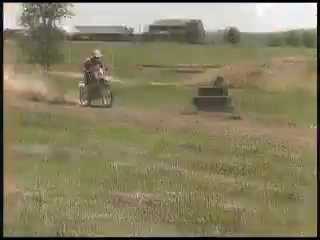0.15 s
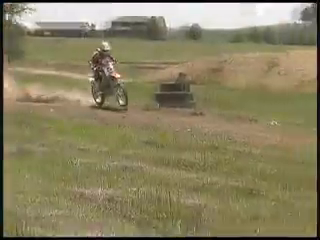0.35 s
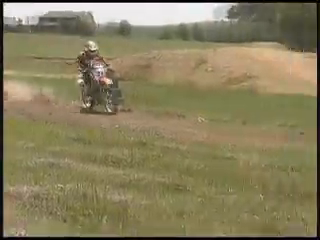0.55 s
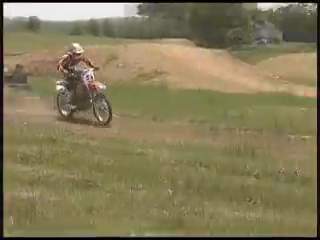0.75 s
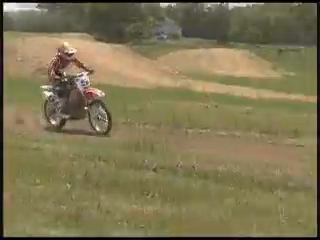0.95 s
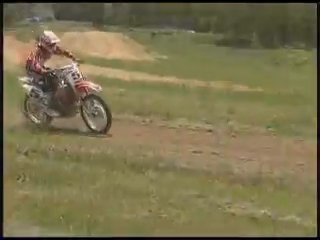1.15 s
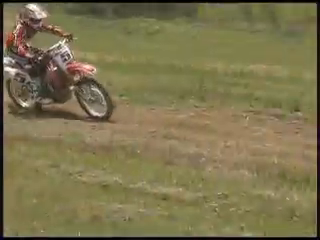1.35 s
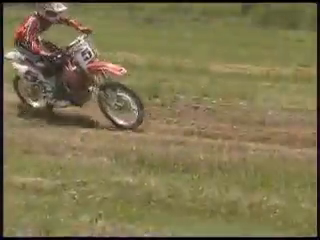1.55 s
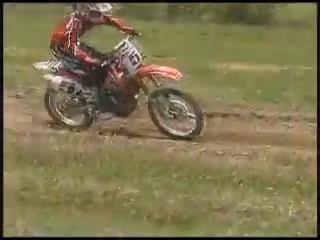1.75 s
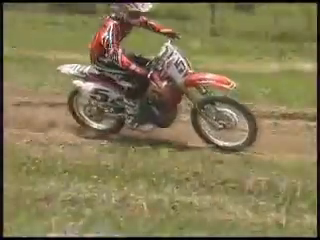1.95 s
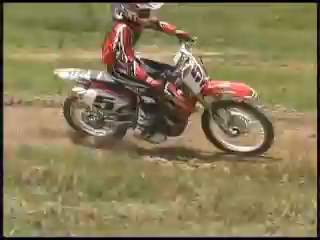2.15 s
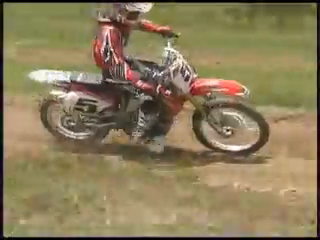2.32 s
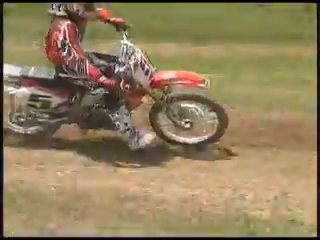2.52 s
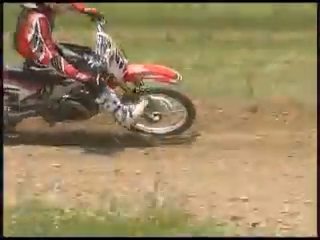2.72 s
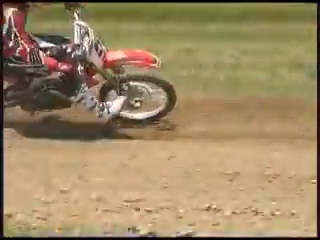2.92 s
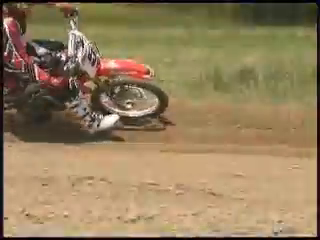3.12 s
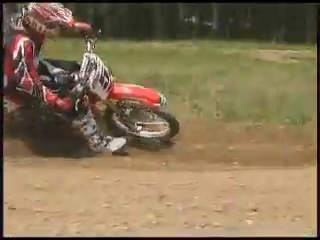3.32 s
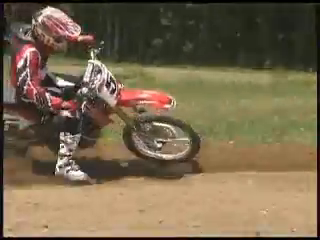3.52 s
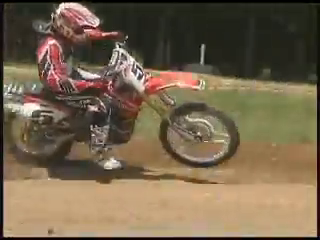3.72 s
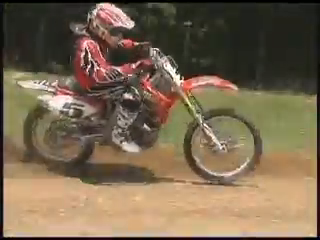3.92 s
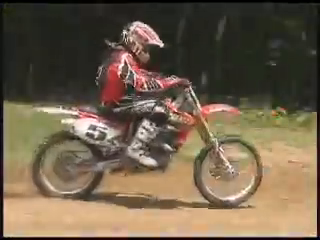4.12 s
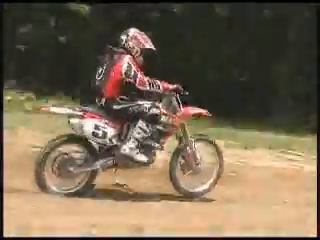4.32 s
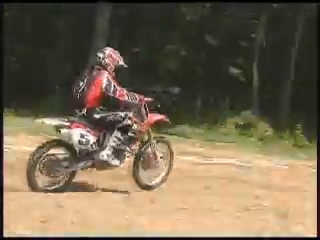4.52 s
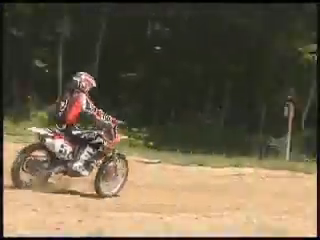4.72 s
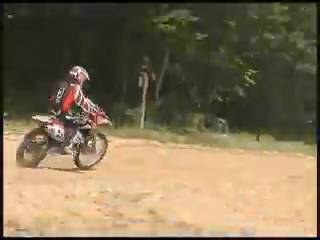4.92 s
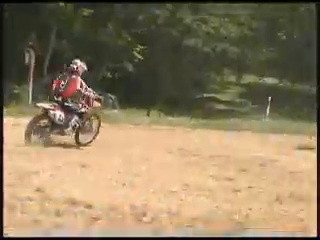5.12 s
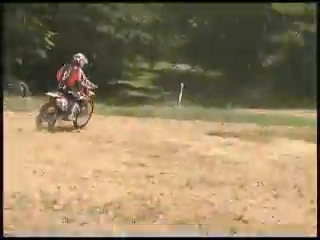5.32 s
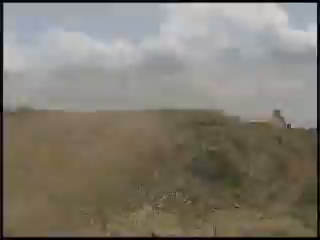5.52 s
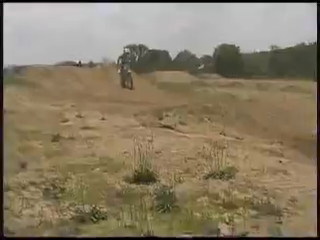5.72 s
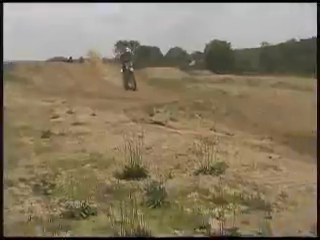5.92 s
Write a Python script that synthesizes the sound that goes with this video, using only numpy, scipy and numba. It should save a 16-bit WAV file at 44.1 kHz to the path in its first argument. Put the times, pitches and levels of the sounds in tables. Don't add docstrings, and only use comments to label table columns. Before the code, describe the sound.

From 0 to about 0.35 s, quick, heavy low beats of a bigger idling engine resonate under a roof and die away, with a wind rumble over a thin distant dirt bike buzz. The bike rises in pitch and rasp around 0.6 s, then the throttle shuts near 0.85 s. Until 2.4 s it slows from a buzz to separate, uneven dull putts, with chain and valve clatter and a few slaps around 1.3-1.4 and 2.3-2.4 s. Blips at 2.8-2.9 s grow fuller and deeper; at 3.2-3.4 s it opens hard, revs leap, sharp tailpipe cracks and hiss become loud and close. From 3.5 to 5.2 s it powers away in a steady bright snarl, with a harsh peak and a wind buffet near 4.9 s. It lifts off, dropping in pitch and fading until 5.67 s, when an abrupt cut brings a louder revving climb. Compressed, slightly overloaded outdoor sound.

```python
import sys
import numpy as np
from scipy import signal
from scipy.fft import rfft, irfft, next_fast_len
from scipy.io import wavfile
from scipy.ndimage import uniform_filter1d
from numba import njit

SR = 44100
rng = np.random.default_rng(int(sys.argv[2]) if len(sys.argv) > 2 else 0)


def makeup_ratio(level_db):
    decades = np.asarray(level_db, float) / 20
    return 10 ** decades


def waveform_to_disk(signal):
    frames = np.transpose(np.atleast_2d(signal))
    scaled = np.clip(frames, -1, 1) * 32767
    samples = np.round(scaled).astype(np.int16)
    wavfile.write(sys.argv[1], SR, samples)


N = 262836


def in_time(*tables):
    s, *columns = np.concatenate(tables).T
    return [np.interp(np.arange(N) / SR, s, column) for column in columns]


def at_hz(points, hz):
    points_hz, values = np.array(points).T
    return np.interp(np.log(hz + 1), np.log(points_hz), values)


def even(x):
    power = uniform_filter1d(uniform_filter1d(x ** 2, size=3000), size=3000)
    return x / np.sqrt(power + 1e-12)


def drift(rate):
    r = np.exp(-2 * np.pi * rate / SR)
    slow = signal.lfilter([1], [1, -2 * r, r * r], rng.standard_normal(N + SR))[SR:]
    return slow / slow.std()


def swell(s, half_s):
    out = np.zeros(N)
    near = np.arange(max(int((s - half_s) * SR), 0), min(int((s + half_s) * SR), N))
    out[near] = .5 + .5 * np.cos(np.pi * np.clip((near / SR - s) / half_s, -1, 1))
    return out


def swells(table):
    return sum(height * swell(s, half_s) for s, height, half_s in table)


def clicks(at, strength):
    out = np.full(N, 1e-18)
    out[np.clip(at, 0, N - 1)] = strength
    return out


def colour(x, spectrum):
    cepstrum = irfft(np.log(makeup_ratio(at_hz(spectrum, np.linspace(0, SR / 2, 2049)))))
    cepstrum[1:2048] *= 2
    cepstrum[2049:] = 0
    return signal.fftconvolve(x, irfft(np.exp(rfft(cepstrum))))[:N]


def band(x, low_hz, high_hz, order):
    return signal.sosfilt(signal.butter(order, [low_hz, high_hz], "band", fs=SR, output="sos"), x)


@njit
def resonance(x, hz, width, sr):
    out, r = np.zeros(len(x)), np.exp(-np.pi * width / sr)
    for i in range(2, len(x)):
        drive = (1 - r * r) / 2 * (x[i] - x[i - 2])
        out[i] = drive + 2 * r * np.cos(2 * np.pi * hz[i] / sr) * out[i - 1] - r * r * out[i - 2]
    return out


def steady_resonance(x, hz, width):
    return resonance(x, np.full(N, hz), width, SR)


def idling():
    # start in seconds, peak in dB, pipe pitch as a share of its mean.
    beats = [
        (0.004, -7.5, 0.88),
        (0.044, -9.5, 1.08),
        (0.082, -8, 0.98),
        (0.119, -10, 1.07),
        (0.146, -15.5, 1.05),
        (0.183, -11.5, .98),
        (0.216, -14, .85),
        (0.25, -19, 0.9),
        (0.287, -17.5, 0.73),
        (0.319, -21, .8),
    ]
    # mode in Hz, level in dB, t60 in seconds, how far it follows the pipe pitch (0-1).
    modes = [(52.7, -1.5, 0.15, 0), (99, -9, 0.31, 0.17), (130, 7, 0.17, 0.7), (181, -6, 0.16, 0.95),
             (252.5, -7, 0.12, 0.48), (279.5, -14, 0.17, 0.21), (446, -12.5, 0.14, .3)]
    out, t = np.zeros(N), np.arange(SR // 2) / SR
    luck = rng.standard_normal((len(beats), len(modes)))
    for (s, peak_db, bend), chances in zip(beats, luck):
        start = int(s * SR)
        for (hz, mode_db, t60, follows), chance in zip(modes, chances):
            decay = makeup_ratio(peak_db + mode_db - 5.5 + 1.2 * chance - 60 * t / t60)
            out[start:start + len(t)] += decay * np.sin(2 * np.pi * hz * bend ** follows * t)
    out = out * (1 + 0.22 * drift(71.0))
    fade_out = np.interp(np.arange(N) / SR, [.32, .38], [1, 0])
    return band(out, 47, 466, order=3) * fade_out


def speed():
    # time in seconds, firings per second.
    ride_speed = [(0, 77.69), (0.36, 76.01), (0.59, 92.68), (0.72, 89.33), (0.91, 63.79), (1.38, 43.39),
                  (1.74, 33.29), (2.39, 27.69), (2.73, 31.41), (2.82, 41.72), (3.16, 42.7), (3.35, 78.41),
                  (3.47, 63.79), (4.23, 63.4), (4.31, 66.66), (5.15, 70.57), (5.38, 50.02), (5.66, 40.82)]
    climb_speed = [(5.67, 75.7), (5.74, 69.99), (5.82, 64.52), (5.9, 64.4), (5.96, 68.48)]
    # moment in seconds, extra firings per second, half length
    # in seconds.
    speed_wiggles = [(0.34, 3.81, 0.14), (1.02, -1.5, .08), (1.17, 2.9, .08), (1.29, -2, .05), (1.42, 2.2, .06),
                     (1.49, -2.5, .05), (1.84, -2.3, .07), (1.95, 3.5, .07), (2.05, -2, .05), (1.68, 4.18, 0.05),
                     (2.04, 5.26, 0.14), (2.56, 3.42, 0.07), (3.62, -5.13, 0.07), (3.88, 2.94, 0.14),
                     (4.4, 2.87, 0.14), (4.76, 2.99, 0.05), (4.9, -3.08, 0.05), (4.9, 5.83, 0.1),
                     (4.92, 6.72, 0.05), (5.12, 9.29, 0.07)]
    return in_time(ride_speed, climb_speed)[0] + swells(speed_wiggles)


def firings():
    turns = .575 + np.cumsum(speed()) / SR
    change = round(5.67 * SR)
    turns[change:] += np.ceil(turns[change]) + .09 - turns[change]
    return np.flatnonzero(np.diff(np.floor(turns)) > 0)


def controls():
    # time in seconds, tailpipe in dB, load (0-1), muffler in dB, chamber in Hz.
    ride = [(0, -24, 0.67, -31, 159), (.39, -21.5, 0.88, -37.5, 152), (.6, -17.5, 0.77, -39.5, 188),
            (.72, -19, 0.92, -41, 170), (.9, -23, 0.5, -44, 152), (1.2, -24.5, 0.23, -39.5, 156),
            (1.33, -22.5, 0.75, -38, 142), (1.42, -22, 0.74, -37.5, 138), (1.53, -22.5, 0.63, -36.5, 150),
            (1.7, -23.5, 0.7, -34.5, 141), (1.82, -26, 0.56, -37, 130), (1.88, -21.5, 0.54, -34.5, 124),
            (1.97, -21.5, 0.75, -32.5, 143), (2.08, -21, 0.6, -31.5, 129), (2.22, -21.5, 0.9, -33.5, 121),
            (2.42, -21.5, 0.57, -33, 129), (2.62, -19, 0.8, -29, 125), (2.75, -19, 0.87, -31, 132),
            (2.82, -27, 0.27, -29, 170), (2.95, -25, 0.56, -26.5, 173), (3.14, -22, 0.4, -26.5, 169),
            (3.205, -19, 0.74, -24, 238), (3.27, -16, 0.88, -23, 189), (3.34, -13, 0.86, -26.5, 142),
            (3.6, -18, 0.89, -34, 135), (3.9, -21.5, 0.76, -37, 135), (4.1, -17.5, 0.84, -37, 138),
            (4.35, -16.5, 0.87, -33.5, 131), (4.8, -19, 0.93, -37, 154), (4.88, -12.5, 0.93, -36, 150.5),
            (5.02, -17, 0.97, -38.5, 142)]
    climb = [(5.2, -17.5, 0.97, -38, 145), (5.3, -23.5, 0.34, -39, 175), (5.66, -25, 1, -38, 130),
             (5.676, -15.5, 0.49, -24.5, 151), (5.75, -18, 0.68, -35, 141), (5.96, -19, 0.77, -36.5, 116)]
    # start and end in seconds, tailpipe
    # drop in dB, muffler drop in dB.
    closings = [
        (0.603, 0.69, 5.5, 0.5),
        (0.789, 0.841, 8.5, 9),
        (0.854, 2.791, 10.5, 1.5),
        (5.206, 5.672, 16, 6.5),
        (5.636, 5.673, 16.5, 3),
    ]
    # moment in seconds, gain in dB, half length in seconds.
    blips = [
        (2.048, 1.5, 0.023),
        (2.811, 5.5, 0.05),
        (2.938, 5, 0.11),
        (3.464, 0, 0.036),
        (4.037, 0.5, 0.14),
        (5.059, 4.5, 0.066),
    ]
    pipe_db, load, thump_db, chamber_hz = in_time(ride, climb)
    pipe_db = pipe_db + swells(blips)
    shut = np.zeros(N)
    slide_s, snap_open_s = 0.019, 0.0034
    for start, end, pipe_drop_db, thump_drop_db in closings:
        corners = [start, start + slide_s, end, end + snap_open_s]
        slide = np.interp(np.arange(N) / SR, corners, [0, 1, 1, 0])
        pipe_db = pipe_db - pipe_drop_db * slide
        thump_db = thump_db - thump_drop_db * slide
        shut = np.maximum(shut, slide)
    load_left = 0.55
    return pipe_db, load * (1 - (1 - load_left) * shut), thump_db, chamber_hz, shut


def blast(fired, front, luck):
    # time in seconds, hiss lag in ms, front in dB, share of sharp edge (0-1), share of long tail (0-1).
    jet = [(.1, 0.76, -10, 0.8, 0.1), (.45, 1.3, -5, 0, 0), (.8, 0.6, 1, 0.5, 0), (1.5, 1.34, 0, 0.7, 0.6),
           (2.8, 0.79, 2, 0, 0.9), (3.2, 1.15, -6, 0.05, 1), (3.45, 0.57, -7, 0, 0.3),
           (3.9, 1.12, 5, 0.26, 0.22), (4.4, 0.75, -22, 0.3, 0), (4.8, 0.49, -12, 0.4, 0),
           (4.95, 0.3, 3, 0.4, 0.2), (5.2, 0.29, -26, 1, 0.25), (5.67, 0.52, 1, 0.1, 0.3),
           (5.96, 0.44, 4, 0, 0)]
    jet_ms, front_db, sharp, tail = in_time(jet)
    sharp, tail = np.clip(sharp, 0, 1), np.clip(tail, 0, 1)
    echo_lag_s = .00103 + .00013 * drift(2.0)[fired] + .00002 * luck[:, 1]
    echo = clicks(fired + (SR * echo_lag_s).astype(int), -makeup_ratio(-3.0 + 1.0 * luck[:, 2]))
    shock = front + echo
    shock = 1.52 * makeup_ratio(front_db) * (sharp * shock + (1 - sharp) * band(shock, 200, 3450, order=2))
    jets = clicks(fired + (SR * jet_ms[fired] / 1000).astype(int), front[fired] * makeup_ratio(luck[:, 5]))
    t = np.arange(round(.03 * SR)) / SR
    rise = 1 - np.exp(-t / 0.0001)
    short, long = [signal.fftconvolve(jets, rise * np.exp(-t / tau_s))[:N] for tau_s in (0.0013, 0.0036)]
    puff = (1 - tail) * short + tail * long
    hiss = puff * rng.standard_normal(N)
    return shock + makeup_ratio(-13) * hiss + band(hiss, 1850, 17500, order=2), puff


def crack(fired, front, luck):
    # frequency in Hz, level in dB per Hz.
    crack_spectrum = [(210, -58), (350, 13), (412, -24), (457, -105), (932, -3.5), (1520, -4), (1690, -1),
                      (3190, -7), (5870, -10.5), (9160, -19), (11300, -14.5), (12100, -128), (15800, -33),
                      (22000, -120)]
    # time in seconds, lower in Hz, lower in dB, upper in Hz, upper in dB.
    mouth = [(.1, 1120, 2, 2580, -6), (.3, 1280, 8, 2360, 8), (.4, 1330, 14, 2040, 2),
             (.5, 1480, -22, 2760, 8), (.58, 1470, -23, 3520, 20), (.68, 1400, -20, 3060, 14),
             (.8, 1350, -19, 2760, 16), (1.5, 1350, 20.5, 3180, 14), (2.2, 1060, 18.5, 2860, 9),
             (2.8, 960, 16, 3140, 8), (2.95, 1050, 22, 2550, 6), (3.1, 1120, 17, 2700, 2),
             (3.19, 1050, 34, 2470, 3), (3.25, 1350, 13, 1980, 3), (3.32, 1570, 3, 2380, 12),
             (3.39, 1440, 4, 2500, 4), (3.46, 1540, -4, 2460, -4), (3.55, 1450, 9, 2920, 1),
             (3.7, 1320, 8, 3200, 1), (3.9, 1150, 14, 2930, -2.5), (4.1, 1410, 5, 2760, 1),
             (4.3, 1530, 3, 3020, 0), (4.5, 1520, 9, 3220, 3.5), (4.65, 1500, 17, 2080, -1),
             (4.8, 1530, 8.5, 2340, -4), (4.86, 1740, 2, 2700, 9), (4.93, 1590, -2, 2880, 4),
             (5.0, 1770, -4, 2780, 8), (5.07, 1730, -14, 2500, 6), (5.14, 1690, 0, 2860, 8),
             (5.2, 1840, 6, 2760, 3), (5.67, 1340, 14, 2230, 18), (5.96, 2300, 8, 2760, 10)]
    # time in seconds, share (0-1).
    snap_share = [(0, .25), (.38, .42), (.85, .35), (1.0, .08), (3.2, .08), (3.5, .08), (4.8, .08),
                  (4.9, .13), (5.2, .14), (5.67, .15), (5.96, .15)]
    # time in seconds, share (0-1).
    tone_share = [(0, .08), (.35, .2), (.6, .12), (.85, .08), (1.0, .04), (2.75, .06), (2.95, .22),
                  (3.2, .35), (3.45, .35), (3.7, .2), (4.2, .18), (4.8, .22), (4.9, .35), (5.2, .35),
                  (5.3, .1), (5.66, .1), (5.7, .25), (5.96, .2)]
    low_hz, low_db, high_hz, high_db = in_time(mouth)
    burst, puff = blast(fired, front, luck)
    burst = colour(burst, crack_spectrum)
    low_ring = makeup_ratio(low_db) * resonance(burst, low_hz, 420., SR)
    high_ring = makeup_ratio(high_db) * resonance(burst, high_hz, 1100., SR)
    burst = burst + low_ring + high_ring
    snap, = in_time(snap_share)
    bare = band(front, 1050, 4800, order=3)
    burst = np.sqrt(1 - snap) * even(burst) + np.sqrt(snap) * even(bare)
    tone, = in_time(tone_share)
    rung = np.zeros(N)
    for hz, db, width in ((low_hz, low_db, 330.), (high_hz, high_db, 650.)):
        rung += makeup_ratio(.5 * db) * resonance(resonance(front, hz, width, SR), hz, 2 * width, SR)
    return np.sqrt(1 - tone) * burst + np.sqrt(tone) * even(rung), puff


def clatter():
    # frequency in Hz, level in dB per Hz.
    clatter_spectrum = [(210, -109), (350, 11.5), (974, 0.5), (1080, 3.5), (1250, 3.5), (1870, 0),
                        (2110, 5.5), (4230, -2.5), (10200, -16.5), (10900, -23), (12100, -118),
                        (15800, -116), (22000, -120)]
    noise = colour(rng.standard_normal(N), clatter_spectrum) * makeup_ratio(1.05 * drift(60.0))
    rattle = steady_resonance(noise, 4200., 700.) * makeup_ratio(-1 + 4.0 * drift(18.))
    return noise + rattle


def tailpipe(fired, luck):
    # time in seconds, treble in dB.
    facing = [(.1, -4), (.36, -5.5), (.57, 1), (.75, 2), (1.2, -0.5), (2.25, -0.5), (2.75, -1.5),
              (3.2, 0.5), (3.4, 1), (3.6, -1.5), (3.8, -3.5), (3.95, -0.5), (4.15, -1.5), (4.3, -3),
              (4.45, -2.5), (4.6, 1), (4.82, 0.5), (5.0, -3), (5.18, -1.5), (5.35, -5), (5.7, -0.5),
              (5.85, 1), (5.96, 0.5)]
    # time in seconds, body in dB.
    flank = [(0, -10), (.3, -18), (.5, -28), (.65, -22), (.8, -21), (1.0, -13), (2.7, 2.5), (3.0, -1),
             (3.3, -4), (3.6, -4.5), (4.0, 2), (4.5, 1), (4.85, 1), (5.15, 1), (5.5, -15), (5.7, -3),
             (5.96, -5)]
    # moment in seconds, clatter gain in dB, half length in seconds.
    slaps = [
        (1.323, 3, 0.019),
        (1.402, 3, 0.045),
        (1.438, 3, 0.013),
        (2.265, 4.5, 0.059),
        (2.348, 5.5, 0.038),
        (2.401, 9, 0.018),
        (2.77, 6.5, 0.024),
    ]
    level_db, share, thump_db, _, shut = controls()
    treble_db = -4.5 - 1.5 * share + in_time(facing)[0] + 1.51 * drift(10.5)
    slap_db = swells(slaps)
    body_db = -6.5 + np.minimum(thump_db - level_db, 0) - 14.5 * shut + in_time(flank)[0]
    uneven_db = .4 + 4.0 * (1 - np.clip(share[fired], 0, 1))
    front = clicks(fired, makeup_ratio(uneven_db * luck[:, 0]))
    burst, puff = crack(fired, front, luck)
    share = np.clip(share, .01, .99)
    mix = np.sqrt(share) * even(burst) + np.sqrt(1 - share) * makeup_ratio(slap_db) * even(clatter())
    top = signal.sosfilt(signal.butter(2, 4500, "high", fs=SR, output="sos"), mix)
    mix = mix + (makeup_ratio(treble_db + 12.5) - 1) * top
    breath = (.15 * puff + .04) * rng.standard_normal(N)
    body = band(14.0 * share * front + breath, 640, 1050, order=3)
    direct = even(band(mix, 890, 8870, order=4))
    return makeup_ratio(level_db + 0.44 * slap_db) * (direct + makeup_ratio(body_db) * even(body))


def muffler(fired, luck):
    # time in seconds, level left
    # in the dip in dB, upper chamber in dB.
    ground = [(.2, -16, -11), (.36, -19, 4.5), (.5, -9.5, -4), (.62, -5, -11), (.75, -13, 2.5),
              (.9, -9, -5), (1.2, -23, -5.5), (1.45, -21, -6), (1.7, -29, -11), (1.95, -37, -6),
              (2.2, -32, -5), (2.42, -47, -13.5), (2.65, -33, -8), (2.8, -10.5, -4.5), (2.95, -14, -5.5),
              (3.1, -12.5, -7.5), (3.22, -9.5, -1.5), (3.62, -6.5, 1.5), (3.75, -10, -6.5),
              (3.9, -10, -6.5), (4.1, -11, 5), (4.35, -7, -10), (4.8, -9, -1), (4.86, 1, 0), (4.93, 7, 4),
              (4.98, -6, 1), (5.03, 3, 2), (5.06, 5, 2), (5.1, 3.5, 3), (5.17, -6, 3.5), (5.3, -16, -6),
              (5.66, -16, -4.5), (5.7, -7.5, 7.5), (5.79, -11, 12.5), (5.88, -18, 9), (5.96, -11, 9.5)]
    _, load, level_db, chamber_hz, shut = controls()
    chamber_hz = chamber_hz * (1 + 0.059 * (1 - .7 * shut) * drift(10.5))
    dip_db, upper_db = in_time(ground)
    dip_db = dip_db + 3 * drift(7.8)
    upper_db = upper_db + 2.6 * drift(4.7)
    rate = speed()
    rough = np.maximum(shut[fired], np.clip((55 - rate[fired]) / 10, 0, 1))
    lead_s = .0085 + .0055 * np.clip((rate[fired] - 45) / 25, 0, 1)
    jitter_s = (.0001 + .00016 * rough) * luck[:, 4]
    push = clicks(fired + (SR * (jitter_s - lead_s)).astype(int), makeup_ratio((.8 + .8 * rough) * luck[:, 3]))
    push = push + .005 * rng.standard_normal(N)
    braking_db = 5.5 + 0.2 * (29.0 - np.abs(rate - 60.0))
    low_db = -17.5 + 7.1 * load + 0.37 * (level_db + 24.0) + shut * braking_db
    low_hz = (1 - shut) * 0.45 * chamber_hz + shut * 103
    low = makeup_ratio(low_db) * resonance(push, low_hz, 26.0, SR)
    main = resonance(resonance(push, chamber_hz, 22.0, SR), chamber_hz, 52.0, SR)
    upper = band(push, 205.5, 325, order=4)
    dip = band(push * (1 + .4 * drift(410.0)), 269, 690, order=4)
    coast_ring = steady_resonance(upper, 214., 24.0) - steady_resonance(upper, 286., 31.0)
    upper = upper + shut * makeup_ratio(9.5) * coast_ring
    rung = even(band(main - low, 53.0, 540, order=3)) + makeup_ratio(upper_db) * even(upper)
    rung = signal.sosfilt(signal.cheby2(10, 60, 400, fs=SR, output="sos"), rung)
    return makeup_ratio(level_db) * (rung + makeup_ratio(dip_db) * even(dip))


def wind():
    # moment in seconds, peak in dB, half length in seconds.
    gust_table = [(0.195, -30, 0.43), (0.748, -57, 0.09), (1.53, -61, .15), (2.12, -52, 0.14),
                  (2.756, -45, 0.13), (3.223, -42, 0.092), (3.55, -57, 0.48), (4.32, -47, 0.39),
                  (4.927, -34, 0.11), (5.075, -43, 0.17), (5.8, -45, 0.4)]
    breeze = makeup_ratio(-58 - 21 * controls()[-1])
    gusts = breeze + sum(makeup_ratio(db) * swell(s, half_s) ** 2 for s, db, half_s in gust_table)
    rumble = even(band(rng.standard_normal(N), 22, 123, order=2))
    return gusts * makeup_ratio(2.5 * drift(8.0)) * rumble


def ports(x):
    # frequency in Hz, side over mid in dB.
    side_level = [(60, -8), (110, -10), (190, -4.5), (350, 5), (620, 6), (1120, -3), (2020, -6),
                  (3620, -15.5), (6510, -19.5), (11700, -14)]
    # frequency in Hz, angle by which side leads mid in radians.
    side_angle = [(100, -1.8), (250, -1.5), (500, -0.91), (1000, -0.99), (2000, -1.05), (5000, -2)]
    size = next_fast_len(N + 4096)
    hz = np.linspace(0, SR / 2, size // 2 + 1)
    turn = makeup_ratio(at_hz(side_level, hz)) * np.exp(1j * at_hz(side_angle, hz))
    side = irfft(rfft(x, size) * turn, size)[:N] * (0.7 + 0.4 * drift(16.0))
    side = side + 0.5 * drift(48.0) * band(side, 370, 620, order=2)
    return np.array([x + side, x - side])


def thinned(x):
    # moment in seconds, depth in dB, half length in seconds.
    holes = [(.06, 8, .03), (.28, 8, .04), (.64, 9, .06), (.93, 12, .11), (1.12, 8, .05), (1.27, 14, .05),
             (1.42, 22, .11), (1.61, 18, .04), (1.79, 16, .06), (1.92, 30, .045), (2.01, 14, .05),
             (2.075, 26, .025), (2.19, 18, .05), (2.28, 28, .06), (2.49, 28, .04), (2.56, 14, .04),
             (2.64, 32, .07), (2.72, 10, .03), (2.87, 13, .07), (3.06, 9, .05), (3.14, 14, .04),
             (3.58, 16, .04), (3.76, 16, .04), (3.82, 12, .03), (3.91, 16, .05), (3.99, 16, .03),
             (4.1, 12, .04), (4.33, 24, .04), (4.41, 7, .03), (4.55, 6, .08), (4.66, 10, .03),
             (4.79, 18, .03), (5.22, 8, .04), (5.33, 10, .05), (5.47, 14, .07), (5.56, 12, .02),
             (5.62, 16, .04), (5.76, 8, .025), (5.81, 8, .02), (5.89, 12, .03), (5.95, 12, .02)]
    # start in seconds, length in seconds.
    open_tops = [(.19, .07), (.4, .07), (.54, .07), (.675, .07), (.765, .045), (2.8, .13), (3.196, .23),
                 (3.447, .054), (3.541, .058), (3.639, .07), (3.76, .038), (3.846, .05), (3.972, .33),
                 (4.321, .47), (4.826, .45), (5.672, .03), (5.79, .08), (5.92, .03)]
    t = np.arange(N) / SR
    left = makeup_ratio(-swells(holes))
    middle = signal.sosfiltfilt(signal.butter(5, [370, 590], "band", fs=SR, output="sos"), x)
    top = x - signal.sosfiltfilt(signal.cheby2(16, 40, 10900, fs=SR, output="sos"), x)
    kept = np.zeros(N)
    for s, length in open_tops:
        end = s + length
        kept += np.interp(t, [s - .01, s + .01, end - .01, end + .01], [0, 1, 1, 0])
    kept = np.clip(kept * (1.35 + 0.73 * drift(20.0)), 0, 1)
    return x - (1 - left) * middle - (1 - kept) * top


def scene():
    fired = firings()
    luck = rng.standard_normal((400, 6))[:len(fired)]
    return ports(idling() + tailpipe(fired, luck) + muffler(fired, luck) + wind())


def band_limit(x):
    return signal.sosfilt(signal.butter(12, 12290, fs=SR, output="sos"), x)


def record(dry):
    loud = .72 * np.tanh(dry / .63)
    mix = signal.sosfilt(signal.cheby2(10, 40, 12200, fs=SR, output="sos"), thinned(loud))
    return band_limit(mix)


dry = scene()
out = record(dry)
waveform_to_disk(out)
```